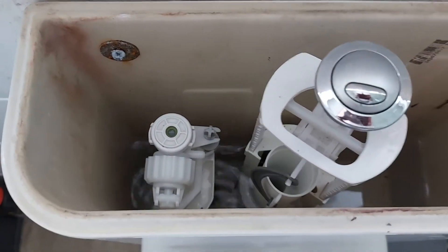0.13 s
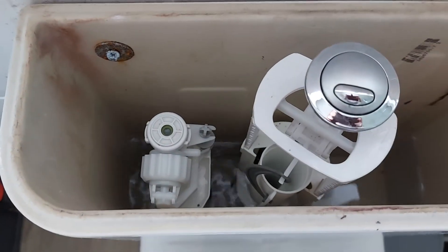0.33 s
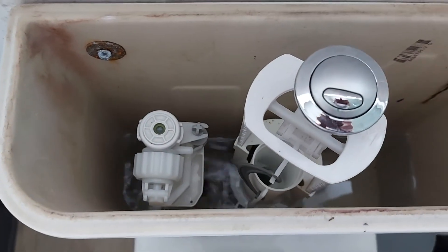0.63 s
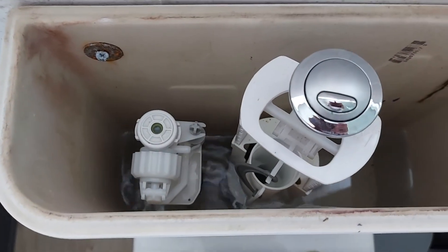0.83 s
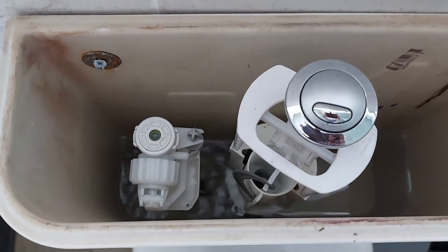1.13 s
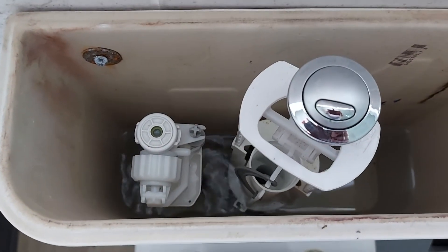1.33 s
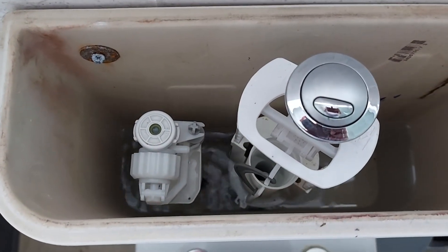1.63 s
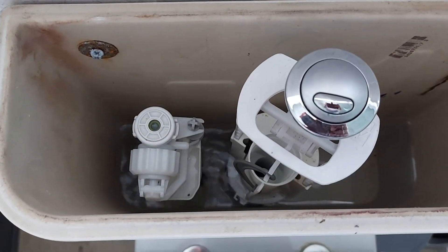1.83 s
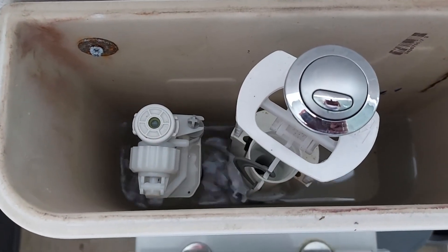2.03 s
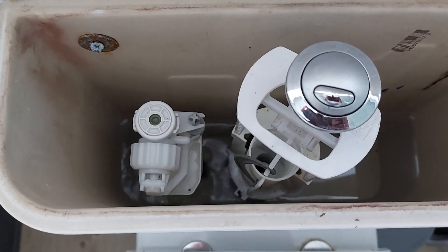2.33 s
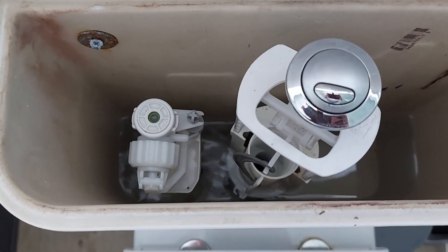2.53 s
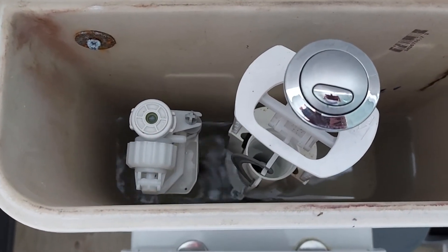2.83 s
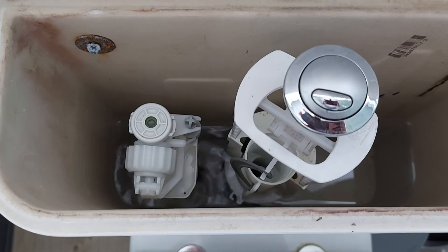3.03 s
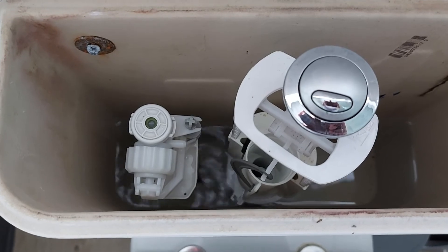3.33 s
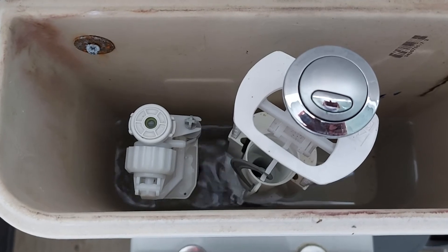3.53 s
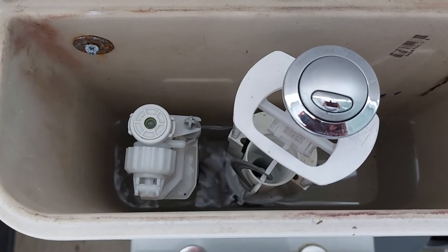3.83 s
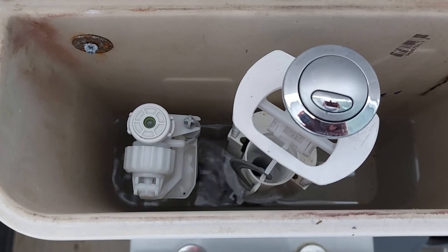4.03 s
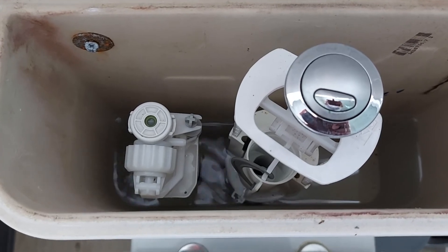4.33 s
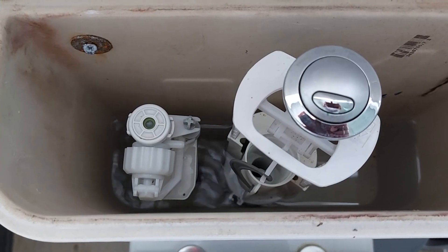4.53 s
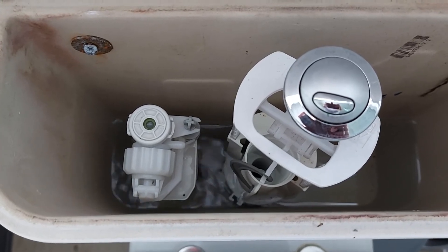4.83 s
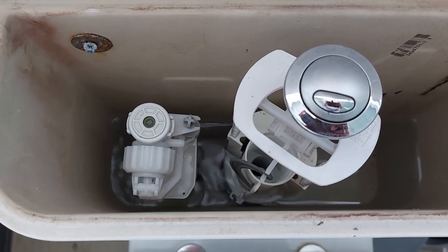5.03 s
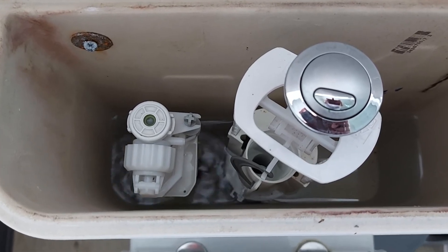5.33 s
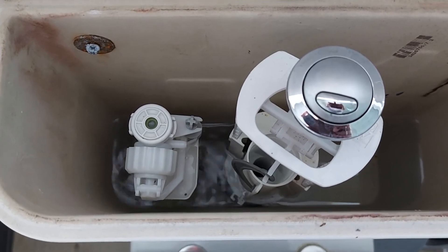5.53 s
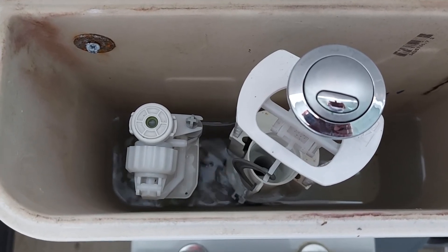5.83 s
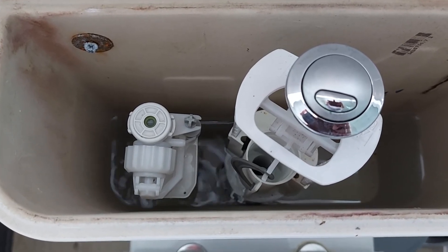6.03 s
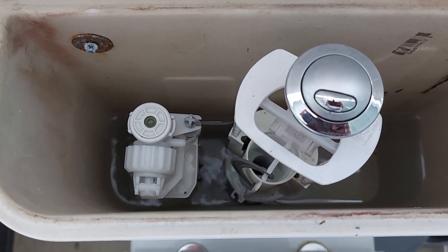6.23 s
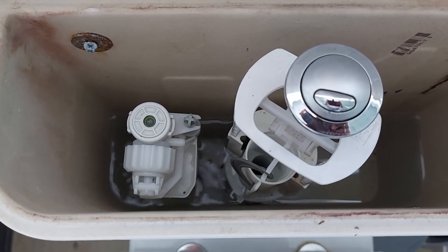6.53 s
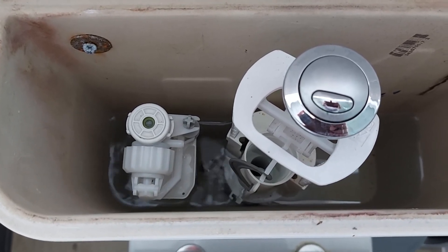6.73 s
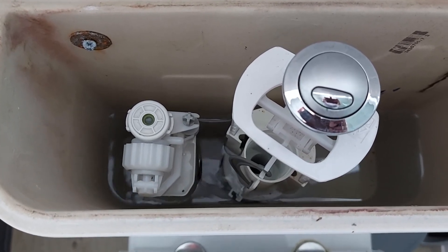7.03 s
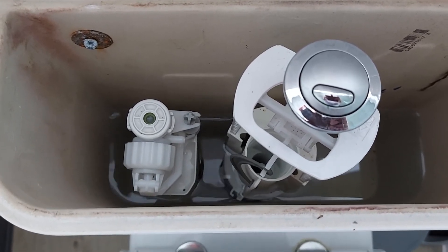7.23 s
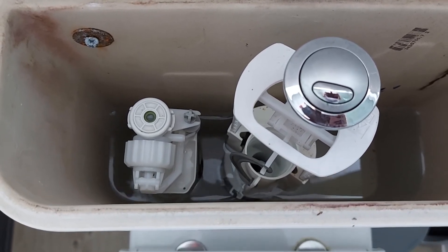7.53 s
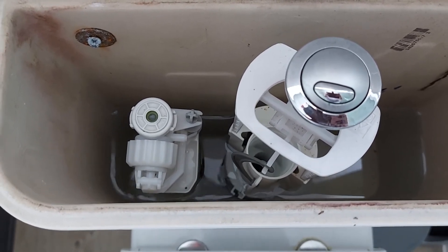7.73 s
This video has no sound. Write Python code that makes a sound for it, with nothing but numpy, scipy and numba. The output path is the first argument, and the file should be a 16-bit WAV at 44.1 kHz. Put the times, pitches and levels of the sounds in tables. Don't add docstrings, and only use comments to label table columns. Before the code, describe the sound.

Close-up water hisses and trickles into a hollow ceramic tank, a fan humming beneath, then trapped air gulps downward and a breathy whistle remains.

```python
import sys
import numpy as np
from scipy import signal
from scipy.fft import rfft, irfft, next_fast_len
from scipy.io import wavfile
from scipy.ndimage import uniform_filter1d
from numba import njit

SR = 44100
rng = np.random.default_rng(int(sys.argv[2]) if len(sys.argv) > 2 else 0)


def transcribe(u):
    v = np.clip(np.atleast_2d(u).T, -1, 1)
    q = np.round(v * 32767).astype(np.int16)
    wavfile.write(sys.argv[1], SR, q)


def amplitude_ratio(level_db):
    exponent = np.asarray(level_db, float) / 20
    return 10 ** exponent


N = 348390


def level(x, db):
    return x * amplitude_ratio(db) / np.sqrt(np.mean(x ** 2))


def at_hz(table, hz):
    table_hz, table_db = np.array(table).T
    return np.interp(np.log(hz), np.log(table_hz), table_db)


def ramp(span_s, start, end):
    return np.interp(np.arange(N) / SR, span_s, [start, end])


def walk(rate):
    hold = int(SR / rate)
    steps = np.repeat(rng.standard_normal(N // hold + 1), hold)
    return 1.3 * uniform_filter1d(uniform_filter1d(steps, hold), hold)[:N]


@njit
def svf(x, hz, width):
    out, band, low = np.empty(len(x)), 0., 0.
    for i in range(len(x)):
        g, damping = np.tan(np.pi * hz[i] / SR), width / hz[i]
        v = (band + g * (x[i] - low)) / (1 + g * (g + damping))
        band, low, out[i] = 2 * v - band, low + 2 * g * v, damping * v
    return out


def resonate(noise, hz, width):
    centre = hz + np.zeros(len(noise))
    return svf(svf(noise, centre, width), centre, width)


def ports(mid, side, pan_db):
    return np.array([(mid + side) * amplitude_ratio(pan_db / 2), (mid - side) * amplitude_ratio(-pan_db / 2)])


# multiple, level_db under the first, left_lead_rad
HUM_ORDERS = [(1, 0, .075), (2, -22, .3), (3, -28, .5), (5, -28, 1.2), (6, -39, 1.2), (8, -41, .8),
              (9, -42, 2.6)]


def hum(hz=100.08, hum_db=-24.5, waver_db=1.2, lean_db=-.4):
    sides = np.array([[.5], [-.5]])
    phase = 2 * np.pi * hz * np.arange(N) / SR
    tones = 0
    for k, db, lead in HUM_ORDERS:
        gain = amplitude_ratio(db + waver_db * (k > 1) * walk(8))
        tones = tones + gain * np.sin(k * phase + lead * sides + rng.uniform(0, 5.93))
    return np.sqrt(2) * tones * amplitude_ratio(hum_db + 0.79 * walk(8.8) + lean_db * sides)


# pitch_hz, side_minus_mid_db
WIDTH = [(40, -20), (130, -32), (250, -16), (400, -23), (650, -4.5), (1300, 3), (2400, 3), (4400, 1),
         (8100, 1.5), (15000, 0)]
# pitch_hz, left_minus_right_db
LEAN = [(30, -7), (60, -3.5), (350, 5), (600, 1), (1400, 4), (2500, 4.5), (4200, -5), (5300, 3),
        (6800, 1.5), (8200, -8.5), (9300, 5), (12000, 6), (15000, 6.5)]


def stereo_noise(colour, direct=0.78, echo_s=0.015):
    size = next_fast_len(N)
    hz = np.maximum(np.fft.rfftfreq(size, 1 / SR), 1)
    source, *scattered = rfft(rng.standard_normal((3, size)))
    fade = np.exp(-np.arange(SR // 5) / SR / echo_s)
    echoes = rng.standard_normal((2, SR // 5)) * fade
    echoes = rfft(echoes / np.linalg.norm(echoes, axis=1, keepdims=True), size)
    echoes = echoes / (np.abs(echoes) + 1e-9) ** .25
    share = direct * (hz > 500) * np.minimum(7000 / hz, 1)
    mid, side = np.sqrt(1 - share) * scattered + np.sqrt(share) * source * echoes
    shape = amplitude_ratio(at_hz(colour, hz)) * (hz > colour[0][0]) * (hz < colour[-1][0])
    return hz, shape * ports(mid, side * amplitude_ratio(at_hz(WIDTH, hz)), at_hz(LEAN, hz))


# pitch_hz, level_db per Hz
RUMBLE = [(18, -25), (30, -15), (45, -8), (60, 0), (80, 0), (120, -1), (150, -61)]


def rumble(rumble_db=-47):
    hz, noise = stereo_noise(RUMBLE)
    return level(irfft(noise)[:, :N], rumble_db)


FLOW_HZ = [350, 1250, 3000, 10000]
BARE_DB = [-0.73, -1, 0.11, -0.68]
COVERED_DB = [1, -0.5, -2, -0.5]


def flow_db(hz):
    bare_db, covered_db = (np.interp(np.log(hz), np.log(FLOW_HZ), db) for db in (BARE_DB, COVERED_DB))
    return ramp((0.36, 4), bare_db, 0) + ramp((7.1, 5.93), 0, covered_db)


# pitch_hz, level_db per Hz
WATER = [(125, -17.5), (190, -16), (380, -18), (620, -28.5), (850, -27), (1050, -30.5), (1250, -30.5),
         (2000, -39), (2720, -31), (3900, -23.5), (5200, -32.5), (6600, -37), (8200, -42.5), (9300, -47),
         (11800, -43), (15900, -52.5)]


def valve(water_db=-38, swell_db=.3, flicker_db=1.2):
    hz, noise = stereo_noise(WATER)
    out, swell = 0, walk(3.68)
    for centre in 125 * 2. ** np.arange(8):
        band = np.cos(np.clip(np.log2(hz / centre), -1, 1) * np.pi / 2) ** 2
        depth = min(centre / 1500, 1)
        moves_db = depth * (swell_db * swell + flicker_db * walk(14))
        out = out + irfft(noise * band)[:, :N] * amplitude_ratio(flow_db(centre) + moves_db)
    return level(out, water_db)


# pitch_hz, width_hz, level_db, left_lead_rad,
# left_minus_right_db, early_change_db, late_change_db, late_s
TANK = [(154.6, 15, -53, 0.39, -5, 2, 0.5, 5.2), (305, 27, -60, 0.3, 3.5, -24, 12, 6.4),
        (364, 48, -47, 0.25, 2, 2, -5, 7), (488.4, 63, -54, 0.87, -11.5, -1, -0.5, 5),
        (550.3, 11, -56.5, 2.05, -5.5, 2.5, 1.5, 4.9), (652, 10, -58.5, 1.67, -0.5, 0.5, 2.5, 5.8),
        (740, 63, -59, 0.55, 3, 3, -7, 3.5), (891, 26, -63.5, 1.5, -3, 2.5, 7, 7.2),
        (1400, 89, -51.5, 2.51, 0, -1, -3, 6.7), (1516, 48, -54.5, 0.99, 6.5, 0, -7.5, 6.3),
        (1639, 60, -52.5, 1.2, 6, -1.5, -8.5, 3.57), (1818, 57, -49, 1.7, -0.5, 1.5, -10, 5.65),
        (1968, 70, -48.5, 0.73, 2, -2, -5, 7.2),
        (2121, 77, -54, 1.9, -9.5, 1, -0.5, 3), (2356, 150, -57.5, 1.04, 6, 2.5, 2, 6.65),
         (2506, 73, -53, 1.7, -2, -3, 5.5, 6.9), (2928, 37, -58.5, 1.7, -6.5, 6, 4, 6.5),
         (3163, 105, -54.5, 1.9, 7, 4.5, -5, 3.8), (3462, 57, -53.5, 2, 9, -0.5, 2.5, 5.7),
         (3640, 110, -51, 2.1, 7, -1, -4, 7.5), (3739, 65, -44.5, 2.1, 5, -6, -4, 6),
         (3924, 120, -46.5, 2.2, -3, -6, -5, 4.7), (4760, 420, -68, 1.4, 4, -8, 11, 4.9),
         (4311, 68, -51, 1.07, 8, 1, -6, 4.1), (5000, 350, -54.5, 3.6, 10.5, -10, -10, 7.8),
         (4184, 63, -50.5, 1.3, -4, -16, -5, 6.3), (3940, 110, -68, 2, 9, -7, 16, 7.2)]


def tank(waver_db=1.37, shared=0.73):
    t, out = np.arange(N) / SR, 0
    early = ramp((2.13, 3.3), 1, 0)
    for hz, width, db, lead, pan_db, early_db, late_db, late_s in TANK:
        centre = hz * (1 + .004 * walk(2.5))
        noises = rng.standard_normal((2, N))
        left, other = (level(svf(svf(n, centre, 1.24 * width), centre, 1.66 * width), db) for n in noises)
        lagged = np.roll(left, int(lead * SR / (2 * np.pi * hz) + .5))
        right = np.sqrt(shared) * lagged + np.sqrt(1 - shared) * other
        late = (1 + np.tanh((t - late_s) / 0.27)) / 2
        gain = amplitude_ratio(flow_db(hz) + early_db * early + late_db * late + waver_db * walk(11))
        out = out + gain * np.array([left * amplitude_ratio(pan_db / 2), right * amplitude_ratio(-pan_db / 2)])
    return out


def bubbles(table, ring_s, tail_s, tail_db, snap_db, rise, gain_db, early_s, attack_s, snap_s, snap_width):
    out, t = np.zeros((2, N + SR)), np.arange(SR // 10) / SR
    for s, db, hz, octaves, pan_db in table:
        ring = np.sin(2 * np.pi * hz * t * (1 + rise * t / ring_s))
        ring = ring * np.exp(-t / ring_s) * (t < 8 * ring_s) * (1 - np.exp(-t / attack_s))
        scatter = rng.standard_normal((2, len(t)))
        width = hz * min(0.59 * octaves, 1.5)
        tail = np.array([level(resonate(n, hz, width), tail_db) for n in scatter])
        tail = tail * np.exp(-t / tail_s) * np.minimum(t / 0.00018, 1)
        snap = np.array([level(resonate(n, .95 * hz, snap_width * hz), snap_db) for n in scatter])
        snap = snap * np.exp(-t / snap_s)
        pan = amplitude_ratio(np.array([[.25], [-.25]]) * pan_db)
        start = max(int((s - early_s) * SR), 0)
        out[:, start:start + len(t)] += amplitude_ratio(db + gain_db) * (ring + tail + snap) * pan
    return out[:, :N]


def sized(table, octaves, lean):
    return [(s, db, hz, octaves, lean * at_hz(LEAN, hz)) for s, db, hz in table]


def fizz(per_s=19, db=-50, spread_db=2.0):
    s, size, pitch, lean = rng.random((int(per_s * N / SR), 4)).T
    hz = 5000 * 3 ** pitch
    return np.transpose([s * N / SR, db + spread_db * size, hz, 0.27 + 0.27 * lean, 2 * at_hz(LEAN, hz)])


# start_s, level_db, pitch_hz
POPS = [(.12, -36.5, 8300), (.424, -36, 8380), (.601, -38, 11350), (.661, -37, 8060), (1.2, -33, 8450),
        (1.5, -37, 8720), (1.737, -33, 12700), (1.858, -30.5, 7740), (1.882, -30, 13300),
        (2.196, -30, 7650), (2.521, -29.5, 7800), (2.533, -33, 11100), (2.757, -37, 12400),
        (3.298, -32, 15200), (3.464, -30, 13900), (3.534, -31, 14800), (3.552, -36, 11500),
        (3.939, -29, 6750), (4.619, -32, 8000), (4.823, -32.5, 11200), (4.942, -35, 9800),
        (5.14, -40, 14900), (5.262, -30, 11500), (6.305, -30.5, 11600), (6.395, -30, 13400),
        (6.909, -34, 13300), (7.083, -27, 11700), (7.388, -31.5, 6940), (7.669, -30.5, 12200),
        (5.213, -40, 12200), (5.253, -42, 11900), (5.392, -44, 14500), (5.434, -39, 15000),
        (6.123, -41, 8500), (6.605, -38, 9000), (6.848, -34, 6620), (7.065, -37, 8000), (7.25, -39, 8000),
        (7.544, -47, 11900), (7.365, -41, 7500)]


def pops():
    return bubbles([*sized(POPS, octaves=.55, lean=1.5), *fizz()],
                   ring_s=0.00015, tail_s=0.007, tail_db=-10.5, snap_db=-5, rise=0.022, gain_db=-4.5,
                   early_s=.0005, attack_s=.00005, snap_s=.003, snap_width=1.1)


# start_s, level_db, pitch_hz
SLAPS = [
    (.276, -29.5, 4240),
    (.516, -25, 4300),
    (1.441, -28, 4300),
    (2.382, -22.5, 4480),
    (2.76, -34, 5000),
    (4.036, -24.5, 4300),
    (4.52, -27, 4100),
    (5.278, -28, 5100),
    (5.371, -24.5, 4420),
    (5.75, -27.5, 4660),
]


def slaps():
    return bubbles(sized(SLAPS, octaves=.25, lean=.6),
                   ring_s=0.0015, tail_s=0.007, tail_db=-6, snap_db=-9, rise=0.011, gain_db=-2.5,
                   early_s=0, attack_s=.0002, snap_s=.003, snap_width=.9)


def splashes(count=26, db=-47, spread_db=2, centre_s=1.5, spread_s=.3):
    when, size, pitch = rng.standard_normal((count, 3)).T
    hz = 1500 * 1.37 ** np.clip(pitch, -2, 1)
    return np.transpose([centre_s + spread_s * when, db + spread_db * np.tanh(size), hz])


# start_s, level_db, pitch_hz
BLIPS = [(.322, -32, 1770), (.819, -34, 1560), (.869, -37, 712), (.996, -33, 850), (1.05, -33.5, 1850),
         (1.197, -36, 1800), (1.330, -27, 726), (1.358, -26.5, 1940), (1.357, -33, 770), (1.368, -33, 764),
         (1.446, -24, 1866), (1.49, -35, 1950), (1.508, -28.5, 1790), (1.514, -29, 1790),
         (1.756, -31, 1850), (2.012, -32, 1870), (2.268, -34, 1010), (2.330, -32, 760), (2.430, -30.5, 900),
         (2.63, -35, 1990), (2.834, -36, 2550), (3.032, -35, 1490), (3.199, -36, 1150), (3.472, -31, 736),
         (4.751, -38, 1130), (5.539, -35, 1100), (5.674, -28.5, 1920), (6.618, -35, 1210),
         (6.792, -33, 1970), (6.923, -35, 1960), (7.069, -36, 2480), (7.352, -33, 2570), (.706, -41, 1810),
         (1.586, -42, 1830), (1.694, -43, 1880), (2.697, -40, 1540), (3.496, -39, 800), (3.55, -40, 1950),
         (3.907, -41, 1960), (4.419, -34, 1900), (4.504, -37, 1940), (4.529, -42, 1970), (5.125, -36, 1950),
         (5.981, -31, 1930), (6.266, -42, 2460), (6.619, -35, 890), (7.07, -38, 1950), (1.526, -35, 1800),
         (1.54, -35, 1750), (1.357, -36, 2380), (1.509, -38, 2040), (1.512, -35, 1620), (1.565, -43, 1950),
         (1.59, -38, 750), (1.698, -38, 895), (2.243, -37, 2360), (2.272, -37, 820), (2.328, -38, 940),
         (2.905, -32, 1980), (3.038, -29, 1950), (3.042, -37, 2530), (3.065, -35, 1970), (3.215, -38, 2550),
         (3.28, -38, 2500), (3.478, -44, 940)]


def blips():
    return bubbles(sized([*BLIPS, *splashes()], octaves=0.45, lean=.3),
                   ring_s=0.004, tail_s=0.012, tail_db=-10.5, snap_db=-10, rise=0.014, gain_db=2,
                   early_s=.003, attack_s=.0012, snap_s=.003, snap_width=1.2)


# start_s, level_db, pitch_hz
DROPS = [(.341, -39, 12500), (.517, -46, 10000), (5.74, -40, 7000), (2.38, -26, 5560), (2.555, -25, 8800),
         (2.716, -29.5, 7400), (4.733, -29, 6400), (5.433, -29, 8040), (5.64, -35, 6540),
         (6.396, -32, 8300), (6.462, -35, 7310), (7.441, -35, 6450), (7.741, -31.5, 6630)]


def drops():
    return bubbles(sized(DROPS, octaves=0.6, lean=1.4),
                   ring_s=0.0003, tail_s=0.007, tail_db=-7.5, snap_db=-4, rise=0.022, gain_db=-4,
                   early_s=.0005, attack_s=.00005, snap_s=.003, snap_width=2.5)


# start_s, length_s, pitch_hz, level_db
GURGLE = [
    (5.8, 0.9, 1280, -56),
    (6.4, 0.36, 1140, -51),
    (6.68, .06, 960, -48),
    (6.741, 0.048, 940, -44.5),
    (6.798, 0.051, 740, -43.5),
    (6.84, 0.04, 695, -47),
    (6.883, 0.032, 527, -35),
    (6.912, .042, 510, -35.5),
    (6.958, .045, 362, -35),
    (7.08, 0.035, 313, -40),
]


def gurgle(sag_per_s=1.9, attack_s=0.0044):
    out = np.zeros((2, N))
    for s, length, pitch, db in GURGLE:
        t = np.arange(int(1.6 * length * SR)) / SR
        hz = pitch * (1 - sag_per_s * np.minimum(t, .06))
        small = np.clip((pitch - 550) / 500, 0, 1)
        width = 120 + 260 * small ** 3
        noises = rng.standard_normal((2, len(t)))
        mid, side = (level(resonate(n, hz, width), -5 + 5 * small) for n in noises)
        mid = mid + (1 - small) * 1.15 * np.sin(2 * np.pi * np.cumsum(hz) / SR)
        shape = np.minimum(t / attack_s, 1) * np.exp(-(t / length) ** 4)
        gain = amplitude_ratio(db + 1.2 * walk(50)[:len(t)])
        start = int(s * SR)
        out[:, start:start + len(t)] += ports(mid, .5 * side, -2.3) * shape * gain
    return out


# start_s, level_db
OUTLET = [
    (6.96, -66),
    (7.06, -48),
    (7.3, -48),
    (7.6, -46.5),
    (7.9, -53),
]


def outlet(pitch_hz=4090, width_hz=120.):
    hz = pitch_hz * (1 + .0015 * walk(3))
    mid, side = (level(resonate(n, hz, width_hz), 0) for n in rng.standard_normal((2, N)))
    db = np.interp(np.arange(N) / SR, *np.transpose(OUTLET), left=-120)
    return ports(mid, 0.53 * side, -1) * amplitude_ratio(db + 1.2 * walk(11))


def scene():
    steady = hum() + rumble() + valve() + tank()
    opening = amplitude_ratio(ramp((0.51, 1.43), -4.5, 0))
    return steady * opening + pops() + slaps() + blips() + drops() + gurgle() + outlet()


def band_limit(x):
    return signal.sosfilt(signal.butter(12, 15830, fs=SR, output="sos"), x)


def record(dry):
    top = signal.ellip(8, .2, 13, 15730, fs=SR, output="sos")
    mix = signal.sosfilt(top, dry)
    return band_limit(mix)


dry = scene()
out = record(dry)
transcribe(out)
```